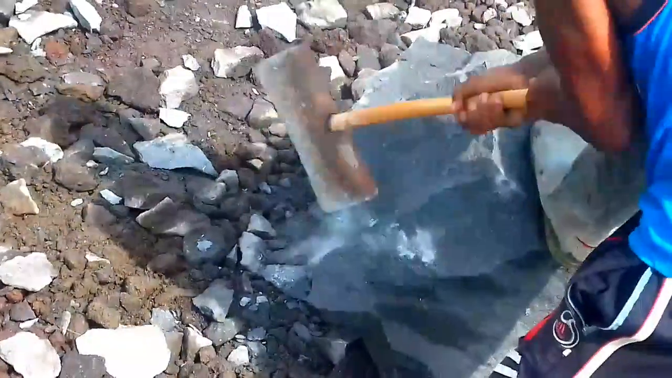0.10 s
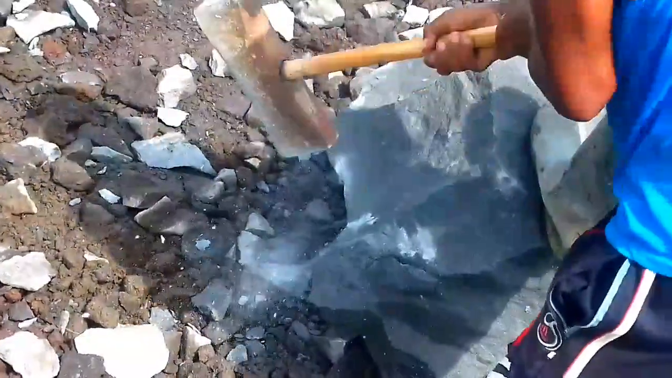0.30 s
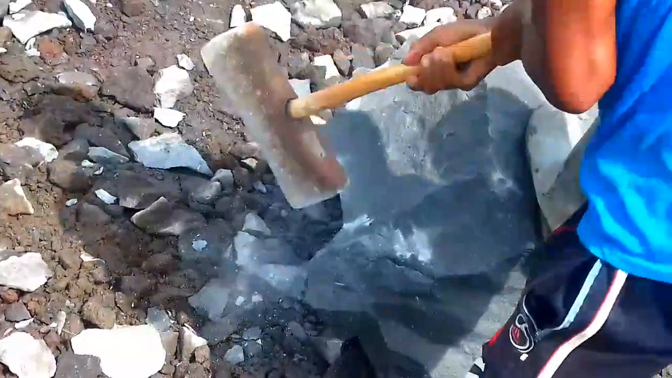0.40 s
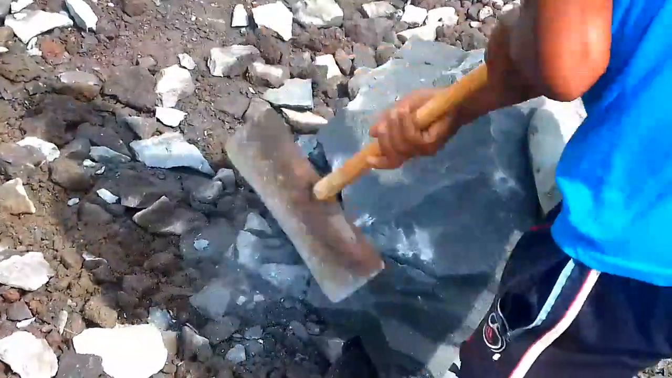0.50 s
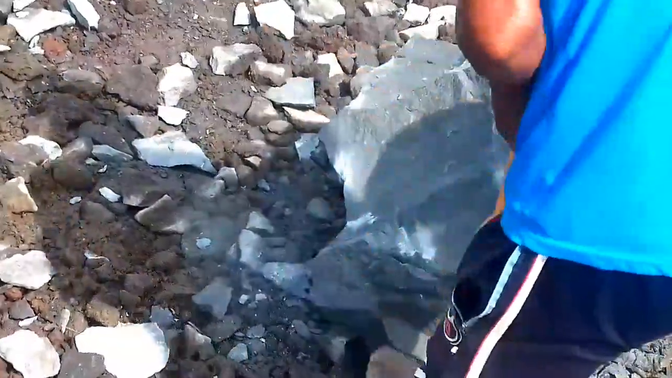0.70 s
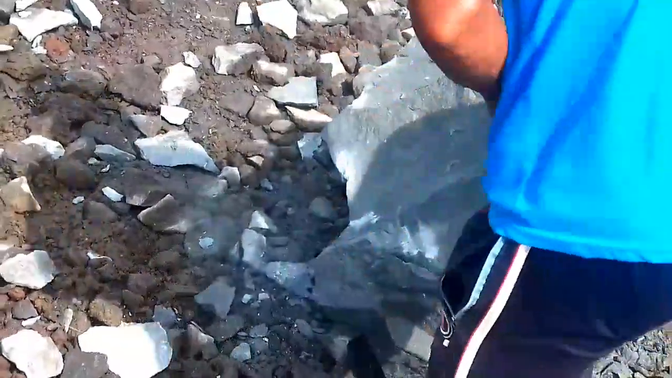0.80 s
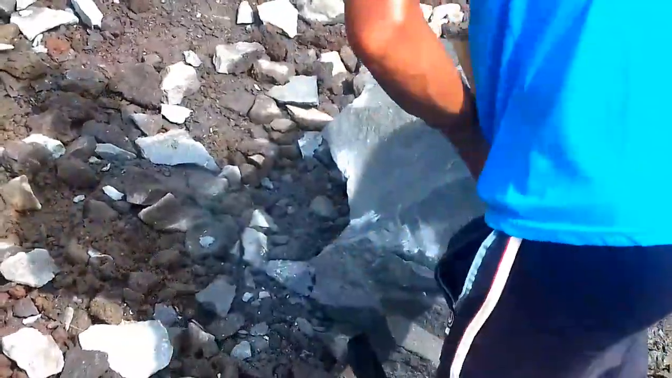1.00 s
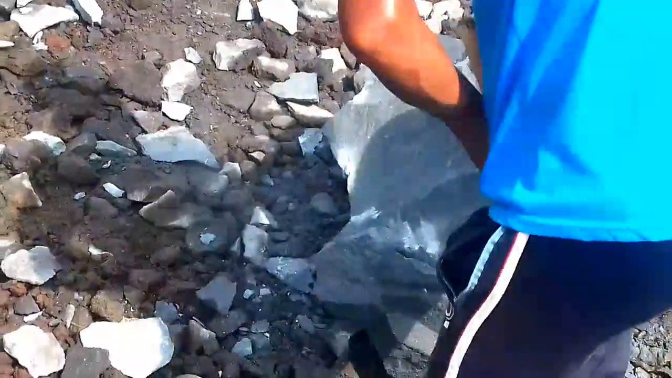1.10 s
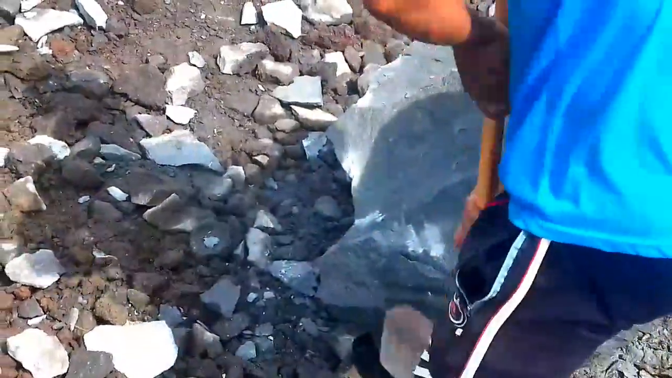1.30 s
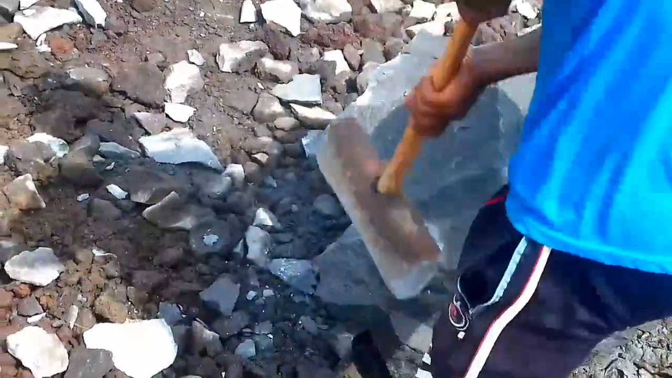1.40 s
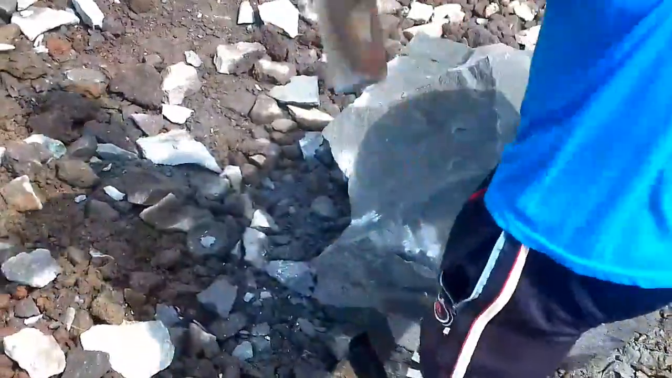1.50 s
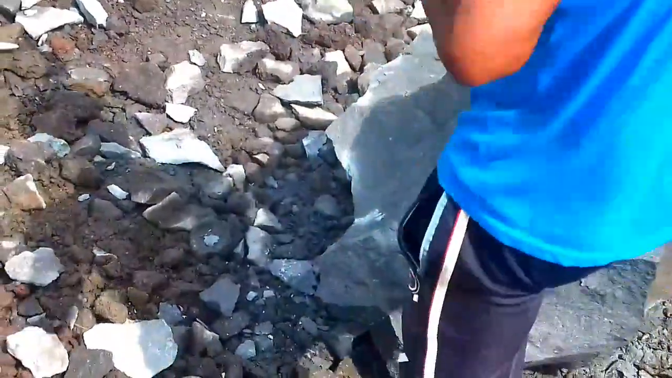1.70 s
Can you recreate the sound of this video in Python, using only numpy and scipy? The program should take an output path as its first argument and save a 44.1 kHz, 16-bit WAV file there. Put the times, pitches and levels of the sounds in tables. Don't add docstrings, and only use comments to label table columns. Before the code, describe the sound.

A sledgehammer strikes a boulder once, close to a phone microphone that overloads; a short rubble wash and high wavering steel ring follow, then sparse stone ticks over a distant engine drone in an open quarry.

```python
import sys
import numpy as np
from scipy import signal
from scipy.fft import rfft, irfft
from scipy.io import wavfile
from scipy.ndimage import uniform_filter1d

SR = 44100
rng = np.random.default_rng(int(sys.argv[2]) if len(sys.argv) > 2 else 0)


def convert_level_to_amplitude(level_db):
    exponent = np.asarray(level_db, float) / 20
    return 10 ** exponent


def generate_wav(sig):
    pcm = np.round(np.clip(np.atleast_2d(sig).T, -1, 1) * 32767).astype(np.int16)
    wavfile.write(sys.argv[1], SR, pcm)


N = 74970

# (time [s], level [dB], length [s])
CONTACTS = [
    (.2238, 3, .002),
    (.2256, 4, .0012),
    (.2284, -3, .0015),
    (.2312, -1, .0015),
    (.2348, -10, .002),
    (.2400, -15, .003),
    (.2445, -18, .003),
]
BLOW_S = CONTACTS[0][0]


def evened(x):
    return x / np.sqrt(np.mean(x ** 2) + 1e-20)


def read(points, hz):
    f, value = np.transpose(points)
    return np.interp(np.log(hz + 1), np.log(f + 1), value)


def resonate(x, hz, width):
    turn = np.exp(2j * np.pi * hz * np.arange(len(x)) / SR)
    r = np.exp(-np.pi * width / SR)
    return 2 * (turn * signal.lfilter([1 - r], [1, -r], x / turn)).real


def body(x, table):
    return sum((-1) ** k * convert_level_to_amplitude(db) * resonate(x, hz, width) for k, (hz, width, db) in enumerate(table))


def coloured(x, points):
    hz = np.fft.rfftfreq(len(x), 1 / SR)
    return irfft(rfft(x) * convert_level_to_amplitude(read(points, hz)), len(x))


def lowpass(x, hz):
    return signal.sosfilt(signal.butter(N=8, Wn=hz, fs=SR, output="sos"), x)


def noise(points, patchy_db):
    frames = N // 128 + 5
    a, b, patches = rng.standard_normal((frames, 257, 3)).T
    patches = uniform_filter1d(patches, size=5, axis=0)
    patches = evened(uniform_filter1d(patches, size=16, axis=1))
    x = signal.istft((a + 1j * b) * convert_level_to_amplitude(patchy_db * patches), nperseg=512, noverlap=384)[1][:N]
    return evened(coloured(x, points))


def contact_force():
    t = np.arange(N) / SR
    force = np.zeros(N)
    for start, db, length in CONTACTS:
        force += convert_level_to_amplitude(db) * (t >= start) * np.exp(-(np.maximum(t - start, 0) / length) ** 2)
    return uniform_filter1d(force, size=16)


def crack(force, grit):
    # (pitch [Hz], level [dB per Hz])
    crack_colour = [(35, -52), (60, -22.5), (475, -5.5), (1020, -2.5), (1590, 0.5), (3050, -26),
                    (4220, -22.5), (13200, -48), (15500, -44.5)]
    t = np.arange(N) / SR
    bright_s = .007
    bright = np.exp(-(np.maximum(t - BLOW_S, 0) / bright_s) ** 2)
    burst = convert_level_to_amplitude(-10) * bright * force * evened(coloured(grit, crack_colour))
    snap_s, length_s, snap_hz, width_hz = .2262, .0007, 7490, 4500
    snap = evened(resonate(resonate(grit, snap_hz, width_hz), snap_hz, width_hz))
    return burst + convert_level_to_amplitude(-23) * np.exp(-((t - snap_s) / length_s) ** 2) * snap


def boulder(force):
    # (pitch [Hz], width [Hz], level [dB])
    stone_modes = [(216, 52, -13), (453, 90, -2.5), (1073, 110, -5), (1346, 88, -3), (1664, 160, -2.5),
                   (2046, 220, -5.5), (2557, 360, -15), (4140, 300, -13)]
    # (delay [s], level [dB])
    faces = [
        (.031, -24.5),
        (.044, -25.5),
    ]
    thud = convert_level_to_amplitude(11) * lowpass(body(force * rng.standard_normal(N), stone_modes), 4600)
    return thud + sum(convert_level_to_amplitude(db) * np.roll(thud, round(delay * SR)) for delay, db in faces)


def rubble():
    # (pitch [Hz], time to fall 60 dB [s])
    fall_times = [(100, 0.14), (400, 0.14), (1000, 0.18), (2000, 0.04), (4500, 0.12), (6000, .05)]
    # (pitch [Hz], level [dB per Hz])
    wash_colour = [(60, -14), (450, -1.5), (680, -10), (1400, 3.5), (2200, -5.5), (3000, -22), (4300, -17),
                   (5600, -42.5)]
    t = np.arange(N) / SR
    grit = evened(coloured(rng.standard_normal(N), wash_colour + [(7000, -70.5)]))
    hz, at, z = signal.stft(grit, SR, nperseg=256)
    z = z * convert_level_to_amplitude(-60 * np.maximum(at - BLOW_S, 0) / read(fall_times, hz)[:, None])
    wash = signal.istft(z, SR, nperseg=256)[1][:N]
    rise_s = 0.0039
    return convert_level_to_amplitude(-17) * np.clip((t - BLOW_S) / rise_s, 0, 1) * wash


def blow():
    force = contact_force()
    return crack(force, rng.standard_normal(N)) + boulder(force) + rubble()


def ring():
    # (time [s], extra ground path [wavelengths], echo share [0-1],
    # main ring level [dB], main ring pitch [Hz])
    swing = [(0.225, -0.62, 1.0, -35.0, 5424), (0.281, 0.5, 0.34, -29.9, 5429),
             (0.339, 1.56, 0.58, -36.6, 5432), (0.4, 2.4, 0.2, -38.5, 5434),
             (0.453, 3.7, 0.38, -40.2, 5433), (0.555, 4.16, 0.1, -48.9, 5430),
             (0.603, 4.49, 0.82, -52.1, 5428), (0.69, 5.28, 0.0, -49.8, 5431),
             (0.818, 5.45, 1.0, -61.4, 5437), (0.862, 6.0, 0.0, -57.9, 5438),
             (0.905, 6.51, 0.92, -53.5, 5436), (0.985, 7.0, 0.0, -62.4, 5432),
             (1.045, 7.54, 0.66, -71.0, 5428), (1.12, 8, 0.2, -86, 5419), (1.33, 9.3, 0.0, -83.3, 5412),
             (1.42, 9.33, 0.43, -95.8, 5412)]
    # (pitch [Hz], level [dB], time to fall 60 dB [s],
    # pitch gap in the pair [Hz], first time the pair cancels [s])
    head_modes = [(3759, -30, 0.15, 14.3, 0.227), (4591, -21, 0.207, 8.2, 0.35),
                  (8000, -44, 0.247, 7.3, 0.247), (8409, -49, 0.328, 7.9, 0.257),
                  (9121, -45, 0.339, 7.7, 0.265), (14160, -62, 0.227, 16.2, 0.168),
                  (4399, -48, 0.08, 12, 0.23), (4150, -48, 0.06, 15, 0.23), (6300, -56, 0.05, 20, 0.23),
                  (7000, -56, 0.05, 20, 0.23), (15500, -62, 0.06, 15, 0.236), (11000, -66, 0.07, 15, 0.236)]
    t = np.arange(N) / SR
    times, *columns = np.transpose(swing)
    path, share, main_db, main_hz = (np.interp(t, times, column) for column in columns)
    age = np.maximum(t - times[0], 0)
    dip_db = 12 * np.exp(-((t - 1.19) / 0.022) ** 2)
    main_db = main_db - dip_db + 3 - 200 * np.maximum(t - times[-1], 0)
    turns = np.cumsum(main_hz) / SR
    direct = np.sin(2 * np.pi * turns)
    ground = share * np.sin(2 * np.pi * (turns - path))
    out = convert_level_to_amplitude(main_db) * (direct + ground)

    pair_share = .8 * np.exp(-age / .2)
    for hz, db, t60, split_hz, null_s in head_modes:
        turns = hz * t + rng.random()
        second = np.sin(2 * np.pi * (turns + split_hz * (t - null_s)))
        pair = np.sin(2 * np.pi * turns) - pair_share * second
        if hz > 5433:
            pair = pair * (1 + .5 * np.cos(2 * np.pi * split_hz * 2.6 * (t - null_s - .025)))
        out += convert_level_to_amplitude(db - 60 * age / t60) * pair
    swell_s = .012
    return np.sqrt(2) * out * (1 - np.exp(-age / swell_s))


def chips():
    # (time [s], level [dB], pitch [Hz])
    landings = [
        (0.156, -54.5, 5000),
        (.34, -51, 4440),
        (.615, -80, 6200),
        (0.741, -68, 5140),
        (.822, -89, 4500),
        (0.834, -78, 6200),
        (1.15, -72, 4670),
        (1.39, -80, 5600),
    ]
    t, out = np.arange(N) / SR, np.zeros(N)
    length_s, width_hz = .007, 1600
    clicks = rng.standard_normal(N) * (rng.random(N) < .1)
    for start, db, hz in landings:
        rattle = clicks
        for _ in range(3):
            rattle = resonate(rattle, hz, width_hz)
        out += convert_level_to_amplitude(db) * evened(rattle) * np.exp(-((t - start) / length_s) ** 2)
    return out


def engine():
    # (pitch [Hz], width [Hz], level [dB])
    pipe = [(50, 5, -5), (102.16, 13, -1.5), (162, 33, -2), (218, 28, 5), (264.6, 19, -1), (360, 120, 3.5)]
    # (time [s], level [dB])
    effort = [(0, -0.5), (.3, -5.5), (.55, -6.5), (.75, 2.5), (1.0, 1), (1.2, 0), (1.45, 3.5), (1.6, 5),
              (1.7, -2)]
    t = np.arange(N) / SR
    firing_hz, jitter, puff_s = 49.73, .06, .0012
    wobble = evened(uniform_filter1d(rng.standard_normal(N), size=1500))
    turns = np.cumsum(firing_hz * (1 + jitter * wobble)) / SR
    strength = convert_level_to_amplitude(1.2 * rng.standard_normal(200))[turns.astype(int)]
    firings = np.diff(np.floor(turns), prepend=0) * strength
    puff = np.exp(-((t[:400] - t[200]) / puff_s) ** 2)
    puffs = signal.oaconvolve(firings, puff, "same")
    return convert_level_to_amplitude(-47 + np.interp(t, *np.transpose(effort))) * evened(body(puffs, pipe))


def whines():
    # (pitch [Hz], width [Hz], level [dB], fade after the blow [dB per s])
    tones = [
        (3465, 20, -66, -1),
        (13600, 12, -76.5, 30.5),
    ]
    after = np.maximum(np.arange(N) / SR - BLOW_S, 0)
    out = np.zeros(N)
    for hz, width, db, fade_db in tones:
        tone = resonate(resonate(rng.standard_normal(N), hz, width), hz, width)
        out += convert_level_to_amplitude(db - fade_db * after) * evened(tone)
    return out


def quarry_air():
    # (pitch [Hz], level [dB per Hz])
    hum_colour = [(30, -4.5), (130, 6.5), (400, -2), (900, -6.5), (2150, -4.5), (3050, -24), (3500, -15),
                  (4900, -19.5)]
    return convert_level_to_amplitude(-44) * lowpass(noise(hum_colour, patchy_db=.8), 5200)


def microphone_hiss():
    # (pitch [Hz], level [dB per Hz])
    hiss_colour = [(3240, -34), (5500, -8.5), (8410, -3.5), (12500, -5.5), (13900, -2), (15500, -15)]
    return convert_level_to_amplitude(-69) * noise(hiss_colour, patchy_db=2.3)


def side_hiss():
    # (pitch [Hz], level [dB per Hz])
    side_colour = [(40, -16), (126, -2), (900, -4.5), (2000, -4.5), (4000, -11.5), (6000, -20), (9500, -14),
                   (15400, -14.5)]
    return convert_level_to_amplitude(-62.5) * noise(side_colour, patchy_db=-2.5)


def suppressed(x):
    # (time [s], gain [dB])
    gain_curve = [(0, 0.5), (.16, 3), (.2, -1.5), (.216, -12), (.3, -4.5), (.41, -14.5), (.58, -17.5),
                  (.68, -15), (.88, -15), (1.08, -18), (1.31, -19), (1.48, -15.5), (1.6, -9.5), (1.7, -3.5)]
    # (pitch [Hz], share of the gain)
    depth = [(60, .9), (300, 0.85), (1500, 0.86), (3400, 1.176), (4800, 0.95), (6300, 0.97), (8500, 1.1),
             (14000, 1)]
    hz, t, z = signal.stft(x, SR, nperseg=256)
    gain_db = np.interp(t, *np.transpose(gain_curve)) * read(depth, hz)[:, None]
    z = z * (hz < 15480)[:, None] * convert_level_to_amplitude(gain_db)
    return signal.istft(z, SR, nperseg=256)[1][..., :N]


def scene():
    background = engine() + whines() + quarry_air() + microphone_hiss()
    mid, side = suppressed(np.array([background, side_hiss()]))
    mid = mid + blow() + ring() + chips()
    return np.array([mid + side, mid - side])


def low_pass(x):
    return signal.sosfilt(signal.butter(12, 16450, fs=SR, output="sos"), x)


def record(dry):
    clip, lean, offset = .49, .008, -.0007
    x = lowpass(np.clip(dry, -clip, clip), 15000)
    mix = x * np.array([[1 + lean], [1 - lean]]) + offset
    return low_pass(mix)


dry = scene()
out = record(dry)
generate_wav(out)
```